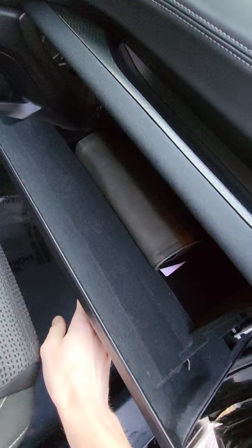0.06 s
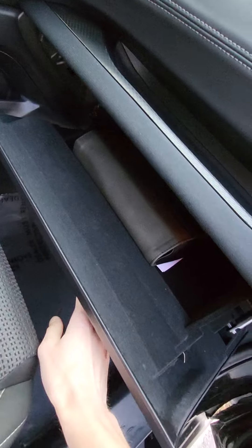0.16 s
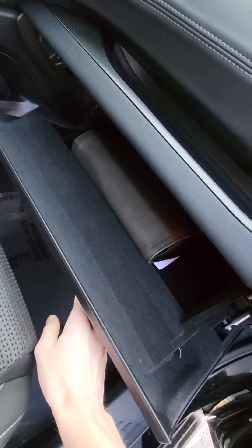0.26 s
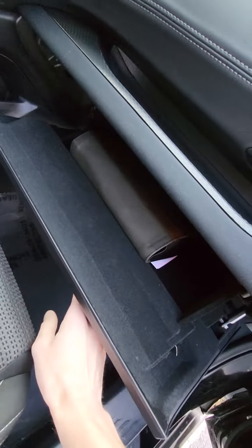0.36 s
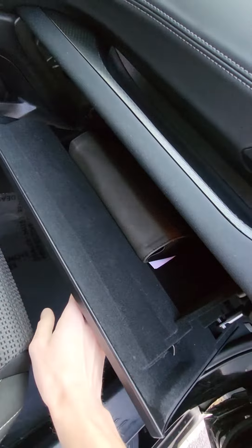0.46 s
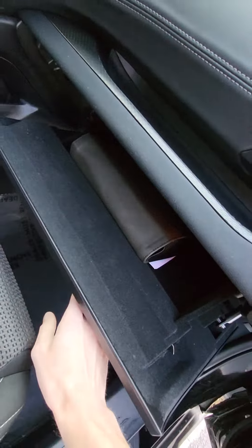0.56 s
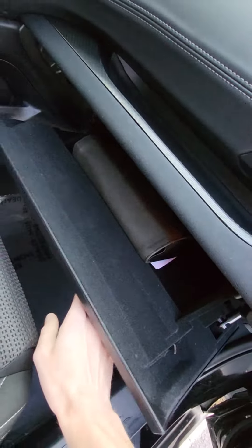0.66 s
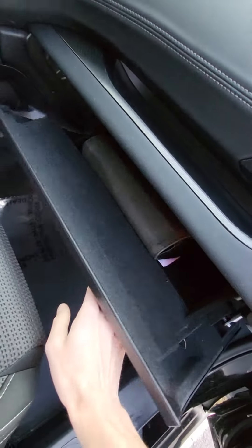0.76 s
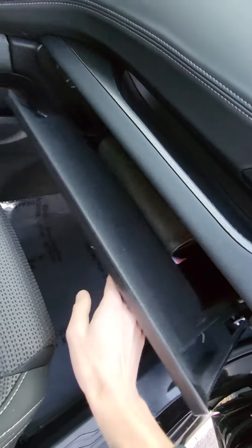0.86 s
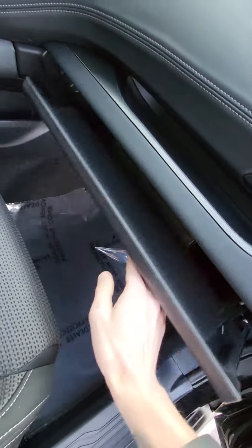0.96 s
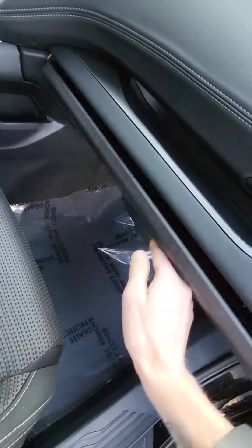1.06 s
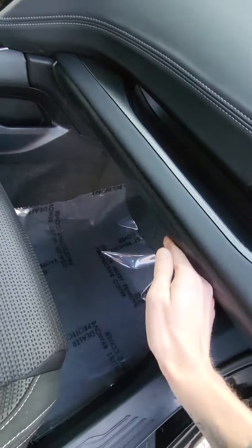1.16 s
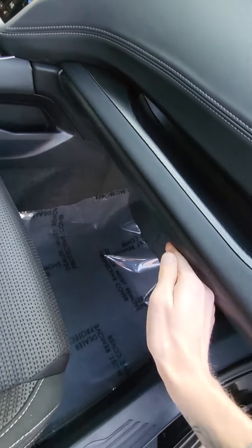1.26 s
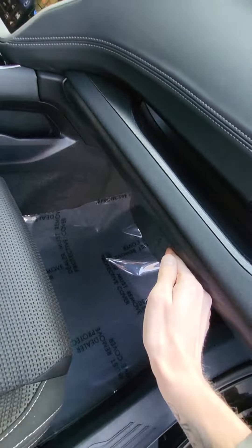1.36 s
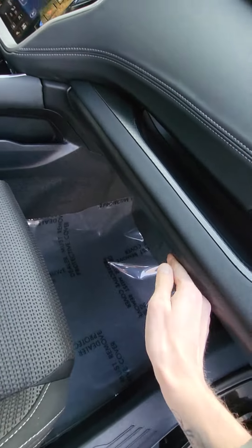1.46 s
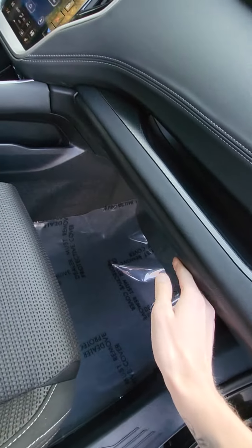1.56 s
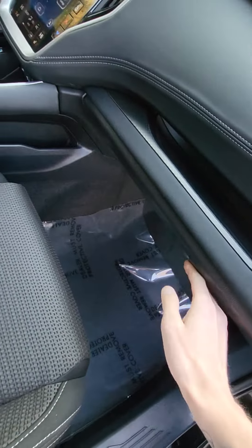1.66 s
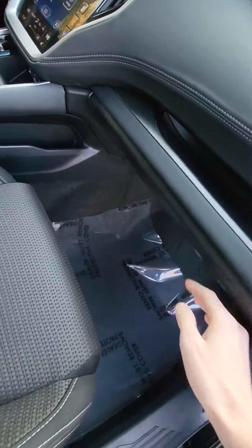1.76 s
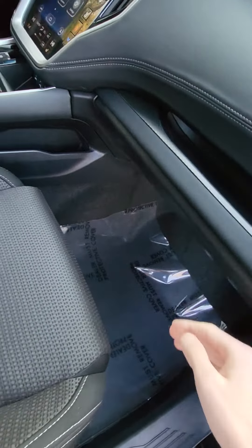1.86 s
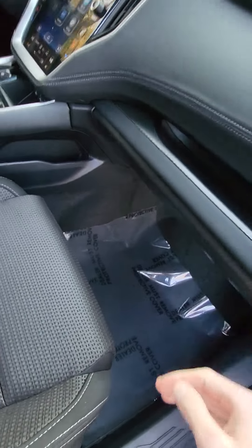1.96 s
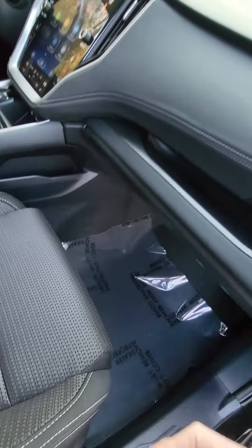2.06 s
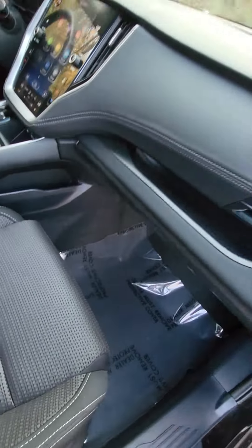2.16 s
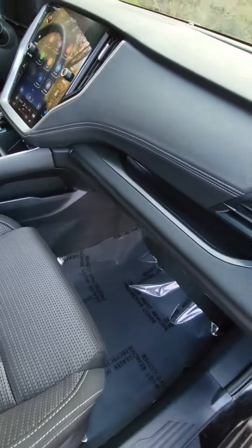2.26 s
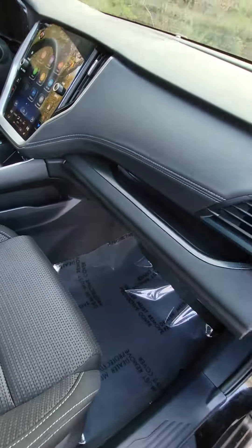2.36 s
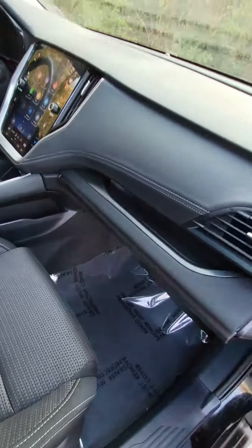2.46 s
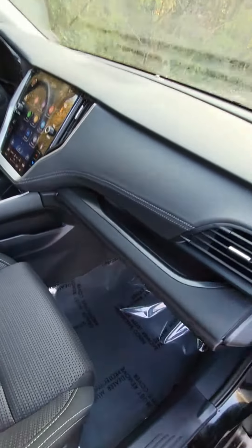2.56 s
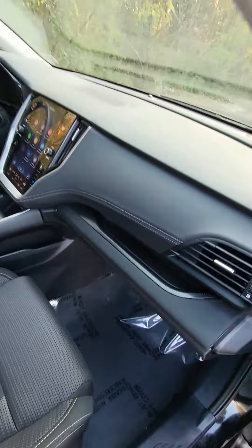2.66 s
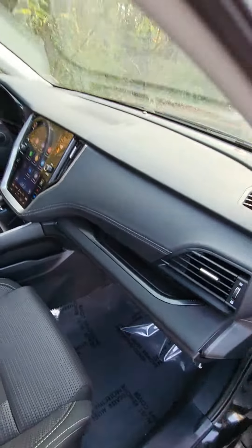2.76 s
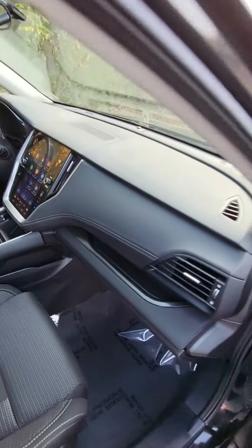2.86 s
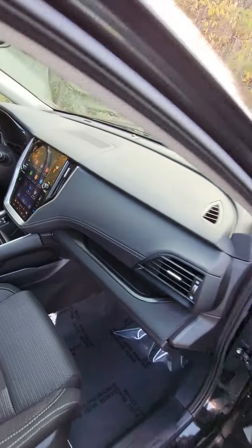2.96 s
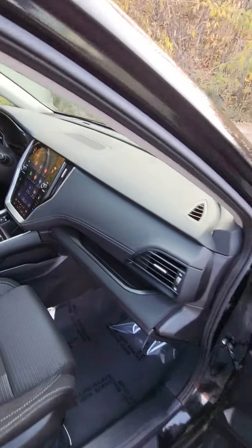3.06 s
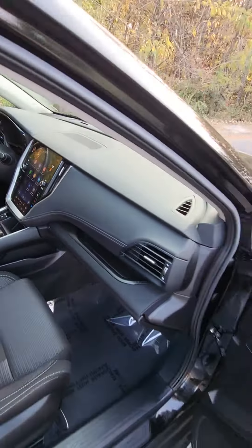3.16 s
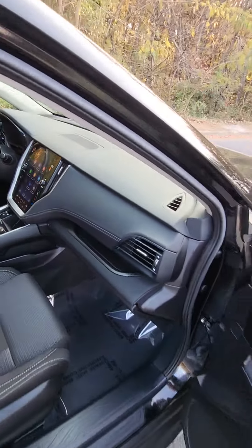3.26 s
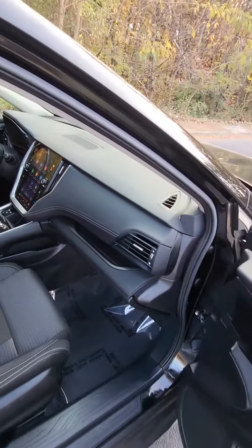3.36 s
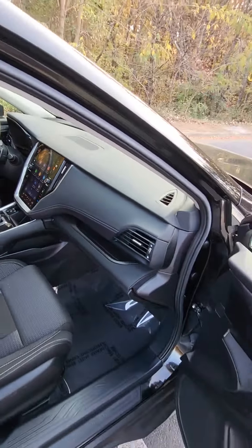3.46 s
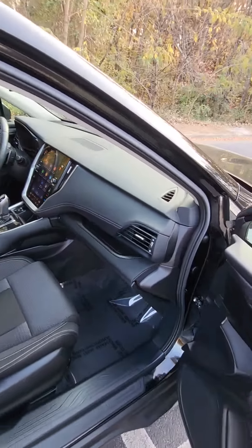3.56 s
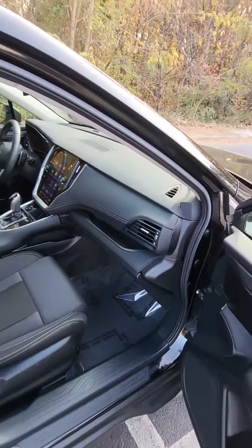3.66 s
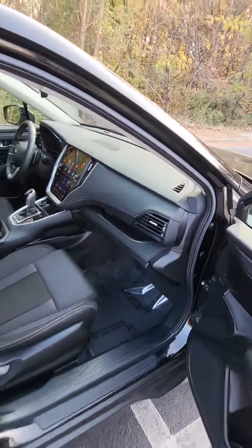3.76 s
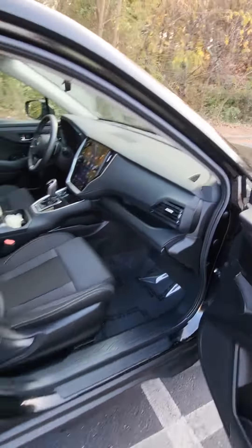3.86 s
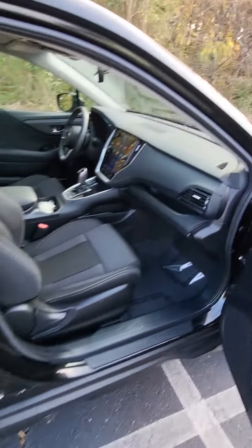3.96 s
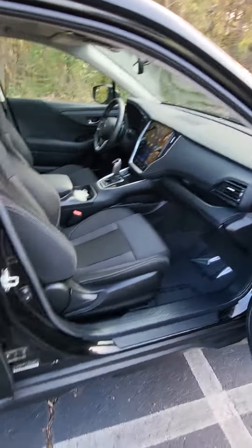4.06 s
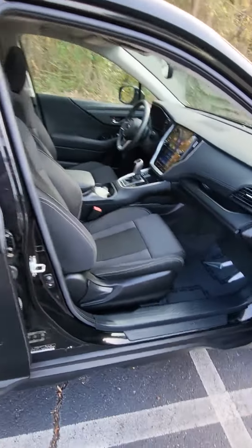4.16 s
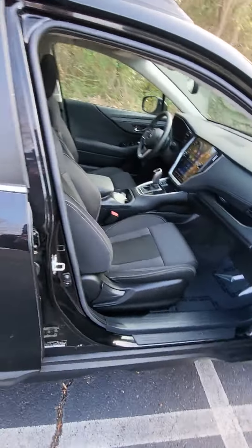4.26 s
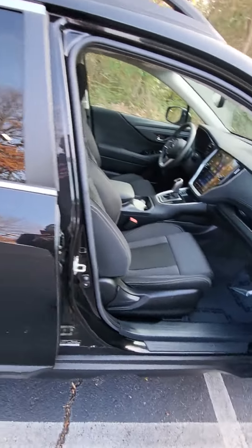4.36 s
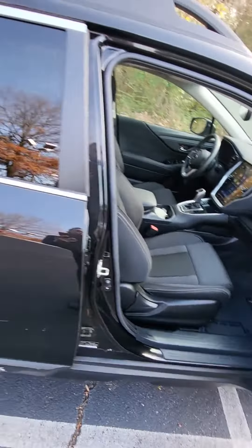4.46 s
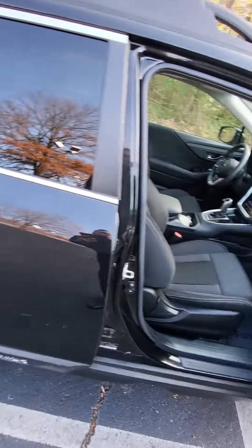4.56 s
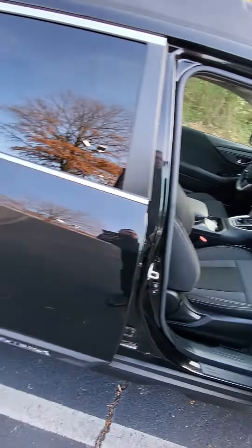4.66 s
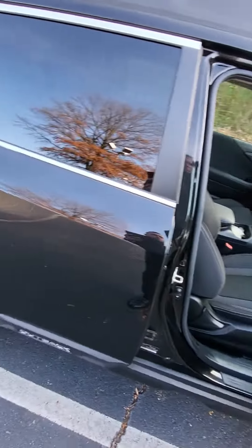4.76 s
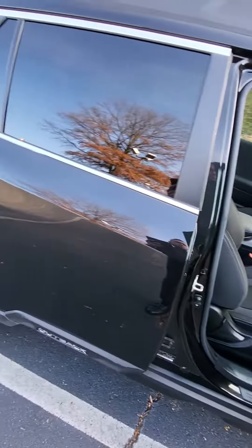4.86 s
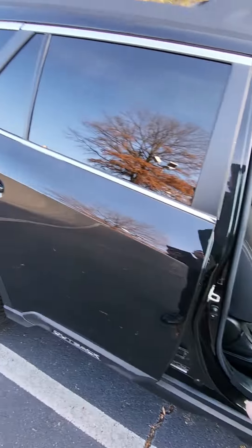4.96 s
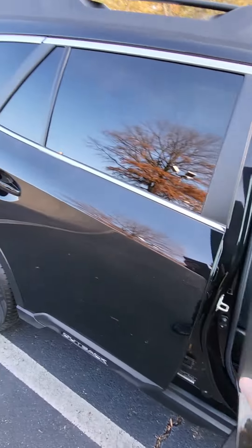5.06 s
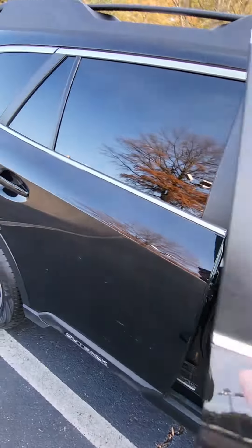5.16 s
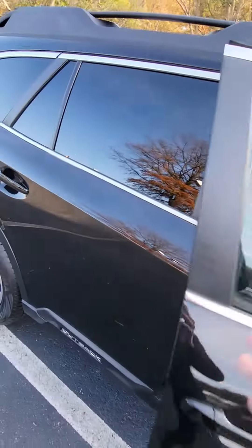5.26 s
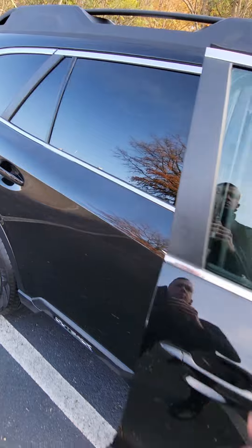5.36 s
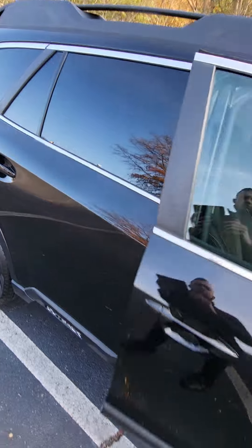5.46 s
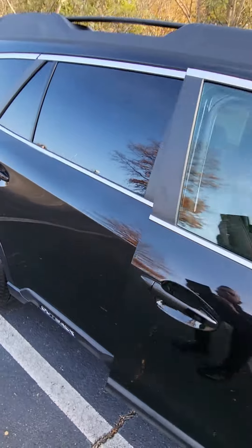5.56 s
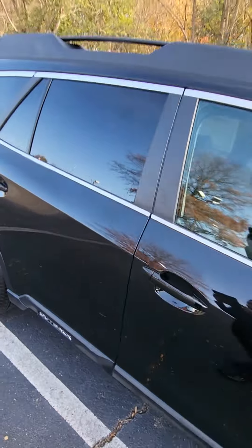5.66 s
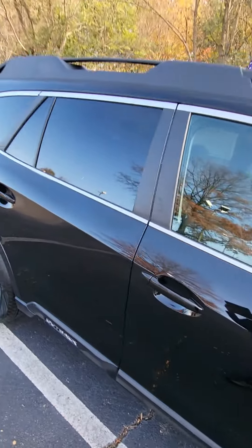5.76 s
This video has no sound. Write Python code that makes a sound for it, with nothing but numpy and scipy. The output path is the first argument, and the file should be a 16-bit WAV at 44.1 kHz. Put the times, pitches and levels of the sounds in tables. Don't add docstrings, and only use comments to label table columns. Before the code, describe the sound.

Over a low idling engine hum, a plastic glove box lid clatters and latches, shoes scuff onto asphalt, then a car door slams with a heavy thud.

```python
import sys
import numpy as np
from scipy import signal
from scipy.fft import rfft, irfft, next_fast_len
from scipy.io import wavfile
from scipy.ndimage import uniform_filter1d

SR = 44100
rng = np.random.default_rng(int(sys.argv[2]) if len(sys.argv) > 2 else 0)


def output_pcm(signal):
    pcm = np.clip(np.atleast_2d(signal).T, -1, 1) * 32767
    wavfile.write(sys.argv[1], SR, np.round(pcm).astype(np.int16))


def magnitude_from_level(level_db):
    exponent = np.asarray(level_db, float) / 20
    return 10 ** exponent


N = 256127


def curve(table):
    s, *columns = np.transpose(table)
    return [np.interp(np.arange(N) / SR, s, c) for c in columns]


def unit(x):
    return x / np.sqrt(np.mean(x ** 2))


def shape_db(points, hz):
    point_hz, point_db = np.array(points).T
    return np.interp(np.log(hz + 1), np.log(point_hz + 1), point_db)


def filtered(x, gain):
    size = next_fast_len(N)
    return irfft(rfft(x, size) * gain(np.fft.rfftfreq(size, 1 / SR)), size)[..., :N]


def walk(rate):
    hold = int(SR / rate)
    steps = np.repeat(rng.standard_normal(N // hold + 1), hold)
    return unit(uniform_filter1d(uniform_filter1d(steps, hold), hold)[:N])


def ports(same, other, share, lag_s=0.000373):
    share = np.clip(share, 0, 1)
    late = filtered(same, lambda hz: np.exp(-2j * np.pi * hz * lag_s))
    return np.sqrt(1 - share) * np.array([late, same]) + np.sqrt(share) * other


def panned(pair, left_minus_right_db):
    return pair * magnitude_from_level(np.array([[left_minus_right_db], [-left_minus_right_db]]) / 2)


# f/Hz, level/dB per Hz
BARE_RATTLE = [(300, -38), (1000, 0.5), (3000, 1.5), (5000, -4.5), (6500, -1), (9000, -10), (12000, -9),
               (16000, -7)]


def struck(blows, modes, crack_db, pan_db, wet_db, tail_s, lag_s, settle_ms, cycles):
    force, crack = np.zeros((2, N))
    grains = rng.standard_normal((len(blows), 4096))
    t = np.arange(4096) / SR
    for (s, push_db, contact_ms, rattle_db, centre_hz), grain in zip(blows, grains):
        push = np.sin(np.pi * np.clip(t * 1000 / contact_ms, 0, 1)) ** 2
        push = magnitude_from_level(push_db) * push / (contact_ms * SR / 2000)
        rattle_ms = settle_ms + cycles * 1000 / centre_hz
        rattle = magnitude_from_level(rattle_db) * grain * np.exp(-t * 1000 / rattle_ms) * (1 - np.exp(-t / .0008))
        band = signal.butter(2, [centre_hz / 1.86, centre_hz * 2.16], "band", fs=SR)
        soften = signal.butter(1, min(centre_hz * 2, 15000), fs=SR)
        bare = signal.lfilter(*soften, rattle) * min(centre_hz / 1500, 1)
        start = int(s * SR)
        crack[start:start + 4096] += bare[:N - start]
        force[start:start + 4096] += (push + signal.lfilter(*band, rattle))[:N - start]

    first = int(blows[0][0] * SR)
    body = magnitude_from_level(crack_db) * filtered(crack, lambda f: magnitude_from_level(shape_db(BARE_RATTLE, f)))
    for k, (hz, db, t60) in enumerate(modes):
        pole = np.exp(2j * np.pi * hz / SR - np.log(1000) / (t60 * SR))
        ring = signal.lfilter([1], [1, -pole], force[first:]).imag
        body[first:] += (-1) ** k * magnitude_from_level(db) * ring

    echo = rng.standard_normal((2, 4096)) * 1000 ** (-t / tail_s) * (t > .001)
    echo = echo / np.sqrt(np.sum(echo ** 2) / 2)
    echo = signal.lfilter(*signal.butter(2, 550, "high", fs=SR), echo)
    wet = signal.fftconvolve(body[None], echo, axes=1)[:, :N]
    return panned(ports(body, 0, 0, lag_s) + magnitude_from_level(wet_db) * wet, pan_db)


# t/s, push level/dB, contact/ms, rattle level/dB, rattle f/Hz
LID_KNOCKS = [(1.0805, -56, .3, -37, 1390), (1.094, -25, 1.6, -65, 1200), (1.106, -60, .3, -54, 815),
              (1.1325, -60, .2, -39.5, 2400), (1.141, -22.5, 1.9, -43.5, 1100),
              (1.146, -60, 0.26, -44, 2420), (1.1534, -17, 1.04, -25, 4250),
              (1.1585, -10, 0.68, -33.5, 1170), (1.1658, -24, 0.81, -35, 3000),
              (1.1723, -15.5, 0.88, -40, 1400), (1.187, -14, 3.8, -53.5, 1500),
              (1.56, -60, 3.1, -72.5, 302), (1.95, -62, 1.8, -73, 297)]
# f/Hz, level/dB, t60/s
LID_MODES = [(94.3, -8.5, 0.3), (190, -44, 0.019), (335, -9.5, 0.12), (436, 4.5, 0.051), (557, -6.5, 0.038),
             (628, -6.5, 0.085), (820, -5, 0.012), (1133, 0.5, 0.015), (1316, 0.5, 0.015),
             (1570, 0, 0.0063), (1780, -25, 0.022), (1790, -4.5, 0.018), (2254, -14.5, 0.02),
             (2360, -15, 0.063), (3220, -9, 0.0088), (3460, -12, 0.012), (4540, -19, 0.0092)]


def glove_box_lid():
    return struck(LID_KNOCKS, LID_MODES, crack_db=18.5, pan_db=0.0, wet_db=0.5, tail_s=0.017,
                  lag_s=-0.00013, settle_ms=2.03, cycles=6.9)


# t/s, push level/dB, contact/ms, rattle level/dB, rattle f/Hz
DOOR_KNOCKS = [(5.648, -33, 0.82, -45.5, 890), (5.6745, -16, 0.77, -50, 800),
               (5.6775, -21, 0.41, -45, 1010), (5.6797, -6, 1.08, -45.5, 6000),
               (5.705, -15.5, 2.1, -47.5, 1000), (5.722, -19, 2.2, -60, 600), (5.745, -22.5, 1.8, -57, 500)]
# f/Hz, level/dB, t60/s
DOOR_MODES = [(139, -7.5, 0.15), (144.8, -8.5, 0.23), (221, -24, 0.094), (242, -21, 0.11), (300, 6, 0.026),
              (353.6, -14.5, 0.17), (432, -22.5, 0.34), (548, -2, 0.039), (620, -6, 0.051),
              (680, -1, 0.053), (826, -1.5, 0.04), (926, -11, 0.061), (1190, -5.5, 0.018),
              (1530, -16, 0.022), (1850, -11, 0.023), (2630, -2, 0.015)]


def car_door():
    return struck(DOOR_KNOCKS, DOOR_MODES, crack_db=21, pan_db=-4.0, wet_db=-6, tail_s=0.06,
                  lag_s=0.00053, settle_ms=11.2, cycles=2.5)


# t/s, peak level/dB
AIR_PUFFS = [(5.7108, -2.5), (5.736, -3.5), (5.770, -11), (5.802, -22)]


def cabin_puffs():
    t = np.arange(N) / SR

    def bump(s, db, ms):
        return magnitude_from_level(db) * np.cos(np.pi / 2 * np.clip((t - s) * 1000 / ms, -1, 1)) ** 2

    spring_s, spring_db, spring_ms = 5.684, -8, 5.5
    rebound_s, rebound_db = .008, -4
    swing = bump(spring_s + rebound_s, spring_db + rebound_db, spring_ms)
    swing -= bump(spring_s, spring_db, spring_ms)
    for k, (s, db) in enumerate(AIR_PUFFS):
        ms = min(3.5 + k * 5.5, 14)
        swing += bump(s, db, ms)
        swing -= bump(s + 1.2 * ms / 1000, db - 13, ms / 2)
    swing = filtered(swing, lambda hz: hz ** 2 / (hz ** 2 + 16 ** 2))
    return panned(swing, -1.8)


# t/s, push level/dB, contact/ms, rattle level/dB, rattle f/Hz
FOOTFALLS = [(3.595, -39, 1.3, -70, 500), (3.616, -38.5, 1.64, -60, 490), (3.642, -52, 2.9, -82, 600),
             (3.879, -36, 0.34, -49.5, 1440)]
# f/Hz, level/dB, t60/s
SOLE_MODES = [(201, -8, 0.083), (283, 10.5, 0.032), (338, 8, 0.055), (432, 5.5, 0.044), (526, -1.5, 0.035),
              (665, 3, 0.036), (860, -3, 0.025), (1100, -13, 0.016)]


def steps():
    return struck(FOOTFALLS, SOLE_MODES, crack_db=7, pan_db=-2.5, wet_db=-8, tail_s=.03,
                  lag_s=.0003, settle_ms=3, cycles=2.5)


# t/s, push level/dB, contact/ms, rattle level/dB, rattle f/Hz
GRIT_SNAPS = [(2.470, -90, .1, -44.5, 6000), (4.596, -90, .15, -42, 3600), (5.590, -90, .15, -48, 1100)]
# f/Hz, level/dB, t60/s
GRIT_MODES = [(1450, -1, 0.0072), (1760, -10.5, 0.019), (3000, -9, 0.01), (4060, -3, 0.0048),
              (6300, -5, 0.0057)]


def grit():
    return struck(GRIT_SNAPS, GRIT_MODES, crack_db=13, pan_db=-2.5, wet_db=-11, tail_s=.015,
                  lag_s=.00005, settle_ms=.9, cycles=2.1)


# start t/s, hold/s, level/dB, extra top level/dB
DRAGS = [(0.717, .1, -66, 2), (1.89, 1, -66, -9), (2.713, 0.44, -60.5, 4), (3.15, .17, -55, 2.5),
         (4.083, 0.035, -54, 1), (4.2, 0.15, -72, 1), (4.407, 0.035, -58, 1.5), (4.553, 0.047, -59.5, 13),
         (4.888, .015, -63.5, 17), (5.2, 0.12, -63, -1), (5.62, 0.033, -55, -2), (5.72, .1, -53.5, -4)]


def drags():
    t = np.arange(N) / SR
    s, hold, db, top_db = np.transpose(DRAGS)[:, :, None]
    rise_db_s, fade_db_s = 90, 94
    away_db = rise_db_s * np.maximum(s - t, 0) + fade_db_s * np.maximum(t - s - hold, 0)
    suddenness = 0.5 + 0.13 * np.maximum(top_db, 0)
    power = magnitude_from_level(2 * (db - away_db * suddenness))
    total = power.sum(axis=0)
    return 10 * np.log10(total), (power * top_db).sum(axis=0) / total


# f/Hz, level/dB per Hz
DRAG_COLOUR = [(500, 7), (1500, 1.5), (3000, -2), (5000, -7.5), (6000, -3.5), (9000, -9.5), (12000, -8),
               (15500, -16), (17000, -49)]


def scuffs():
    level_db, top_db = drags()
    grain_db = 3.2 * np.minimum(rng.exponential(size=N), 5) + 1.1 * walk(40)
    grains = rng.standard_normal((3, N)) * magnitude_from_level(grain_db)
    hiss = unit(filtered(grains, lambda f: magnitude_from_level(shape_db(DRAG_COLOUR, f))))
    top = filtered(hiss, lambda f: 1 / (1 + (9000 / (f + 1)) ** 4))
    hiss = (hiss + (magnitude_from_level(top_db) - 1) * top) * magnitude_from_level(level_db)
    return panned(ports(hiss[0], hiss[1:], .7), -4)


# t/s, firing-pair rate f/Hz, how far the microphone is out of the cabin/0-1
IDLE_RATE = [(0, 25.4, 0), (1.6, 25.4, 0), (3.2, 25.4, .65), (4.68, 25.6, .95), (5.0, 28.2, 1),
             (5.2, 28.6, 1), (5.54, 28.0, 1)]
# multiple of the rate, level/dB in the cabin, level/dB outside
MAIN_ORDERS = [(1, -44.5, -53), (2, -50, -51), (3, -44.5, -42), (5, -57, -51)]
# multiple of the rate, level/dB against order 3
WEAK_ORDERS = [(4, -10), (6, -22), (7, -22), (8, -28)]
# f/Hz, width/Hz, level/dB
INJECTOR_PEAKS = [(7580, 300, 0.5), (9530, 370, -5), (6200, 1300, -6.5)]
# level/dB in the cabin, level/dB outside
TICK_LEVELS = (-76.5, -67)


def engine():
    hz, out = curve(IDLE_RATE)

    def between(cabin_db, open_db):
        return cabin_db + out * (open_db - cabin_db)

    turns = np.cumsum(hz * (1 + .003 * walk(4))) / SR
    third_db = between(*MAIN_ORDERS[2][1:])
    orders = [(k, between(*db)) for k, *db in MAIN_ORDERS]
    orders += [(k, third_db + db) for k, db in WEAK_ORDERS]
    hum = np.zeros(N)
    for k, db in orders:
        level = np.sqrt(2) * magnitude_from_level(db + 1.1 * walk(6))
        hum += level * np.sin(2 * np.pi * (k * turns + .03 * walk(9)))

    def ring(f):
        return sum(magnitude_from_level(db) / (1 + ((f - c) / (w / 2)) ** 2) for c, w, db in INJECTOR_PEAKS)

    size_db = 2.6 * rng.standard_normal(400)[turns.astype(int)]
    gate = magnitude_from_level(size_db) * np.exp(-(turns % 1) / .22)
    ticks = unit(filtered(gate * rng.standard_normal((3, N)), ring)) * magnitude_from_level(between(*TICK_LEVELS))
    return ports(hum, 0, 0) + ports(ticks[0], ticks[1:], 1.0)


# t/s, level/dB, share of open air/0-1, left minus right level/dB
AIR_MIX = [(0, -44, 0.42, -4), (1, -44, 0.72, -3.5), (2, -45, 0.48, -3.5), (2.6, -44, 0.77, -4),
           (3.2, -44, 0.9, -3.5), (4, -42.5, 0.77, -3.5), (4.8, -41.5, 0.78, -3.5), (5.8, -39, 0.6, -1.5)]
# f/Hz, level/dB per Hz
CABIN_COLOUR = [(12, -37), (22, -6.5), (49, -3), (95, 2), (125, -16.5), (170, -21), (240, -17),
                (310, -22.5), (446, -13), (540, -30), (800, -33), (1710, -37), (7520, -56), (16000, -70.5)]
# f/Hz, level/dB per Hz
OPEN_COLOUR = [(12, -34), (25, -24.5), (60, -5.5), (105, -13), (198, -17), (422, -27.5), (698, -22.5),
               (1090, -27), (2990, -43), (3630, -34.5), (5230, -48.5), (7730, -39.5), (8650, -53.5),
               (16000, -46.5)]


def surroundings():
    level_db, outside, pan_db = curve(AIR_MIX)
    outside = np.clip(outside, 0, 1)
    swell = walk(1.0)

    def middle_colour(f):
        return magnitude_from_level((shape_db(CABIN_COLOUR, f) + shape_db(OPEN_COLOUR, f)) / 2)

    noise = filtered(rng.standard_normal((3, N)), middle_colour)
    noise = np.vstack([ports(noise[0], 0, 0), noise[1:]]) / np.std(noise)
    size = next_fast_len(N)
    f = np.fft.rfftfreq(size, 1 / SR)
    spectrum = rfft(noise, size)
    out = np.zeros((2, N))
    for hz in 22 * 2 ** np.arange(0, 10, .5):
        window = np.cos(np.pi / 2 * np.clip(2 * np.log2(f / hz + 1e-9), -1, 1)) ** 2
        band = irfft(spectrum * window, size)[:, :N]
        apart = min(hz / 1200., .5)
        pair = np.sqrt(1 - apart) * band[:2] + np.sqrt(apart) * band[2:]
        change_db = (outside - .5) * (shape_db(OPEN_COLOUR, hz) - shape_db(CABIN_COLOUR, hz))
        out += magnitude_from_level(change_db + .4 * swell + .8 * walk(9)) * pair
    return out * magnitude_from_level(level_db + np.array([pan_db, -pan_db]) / 2)


def scene():
    car = glove_box_lid() + car_door() + cabin_puffs()
    feet = steps() + grit() + scuffs()
    return car + feet + engine() + surroundings()


def band_limit(x):
    return signal.sosfilt(signal.butter(12, 16270, fs=SR, output="sos"), x)


def record(dry):
    limited = np.clip(dry, -1, 1)
    mix = filtered(limited, lambda hz: np.clip((16000 - hz) / 300, 0, 1))
    return band_limit(mix)


dry = scene()
out = record(dry)
output_pcm(out)
```